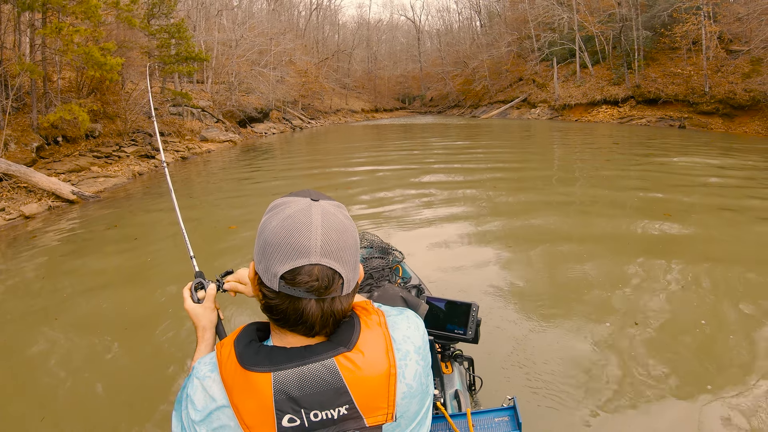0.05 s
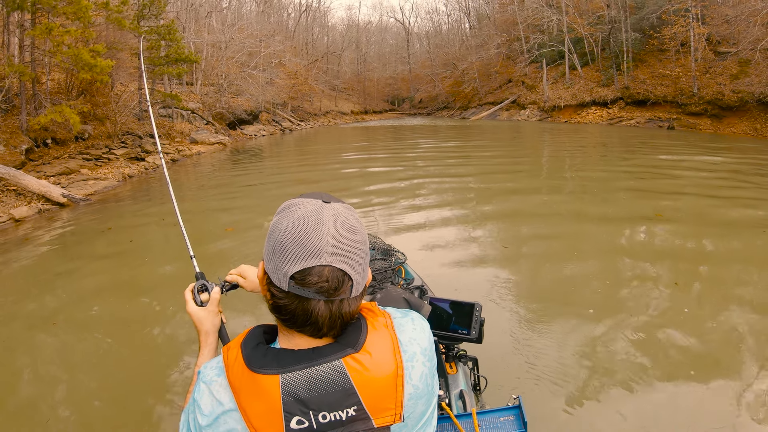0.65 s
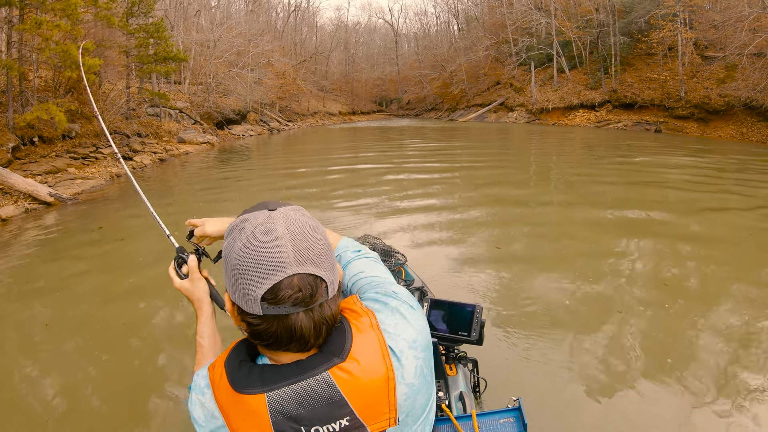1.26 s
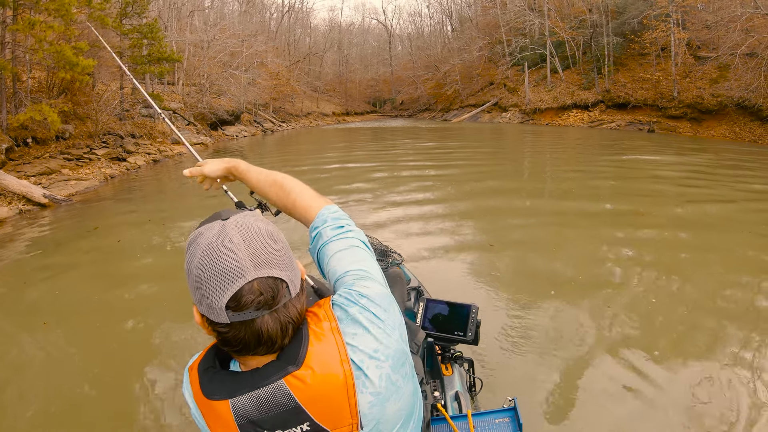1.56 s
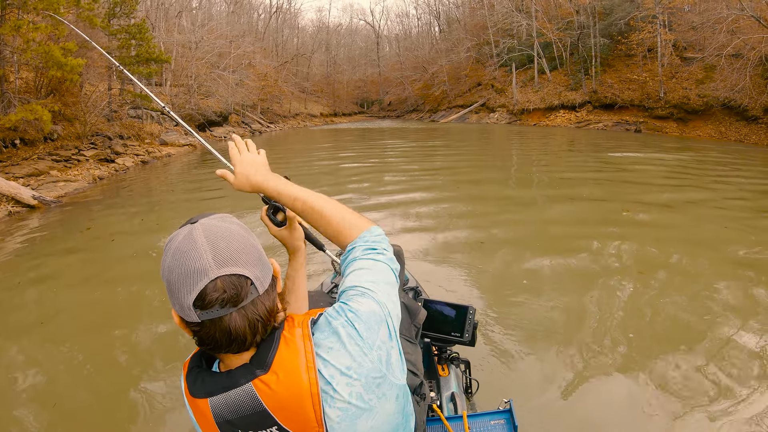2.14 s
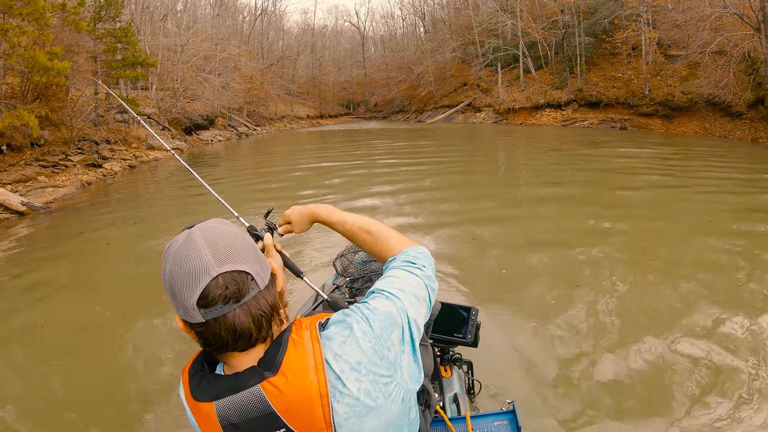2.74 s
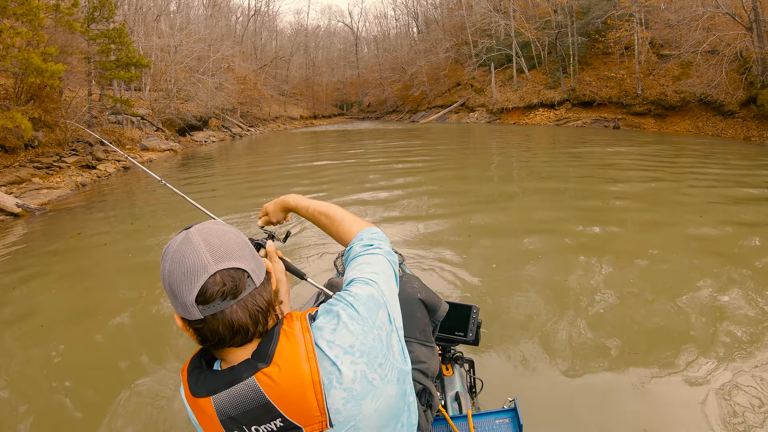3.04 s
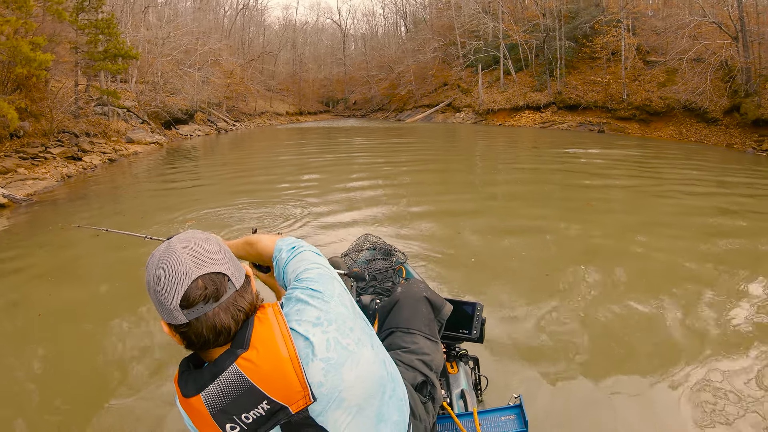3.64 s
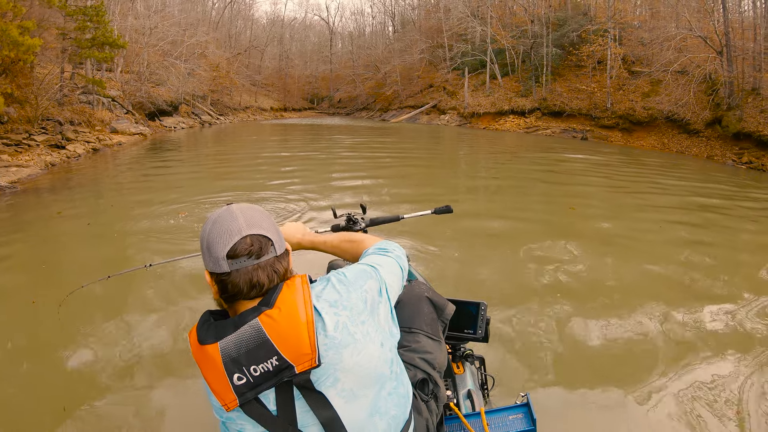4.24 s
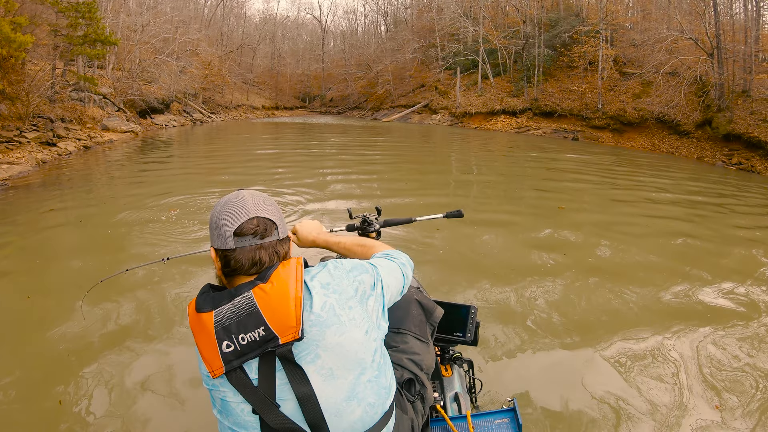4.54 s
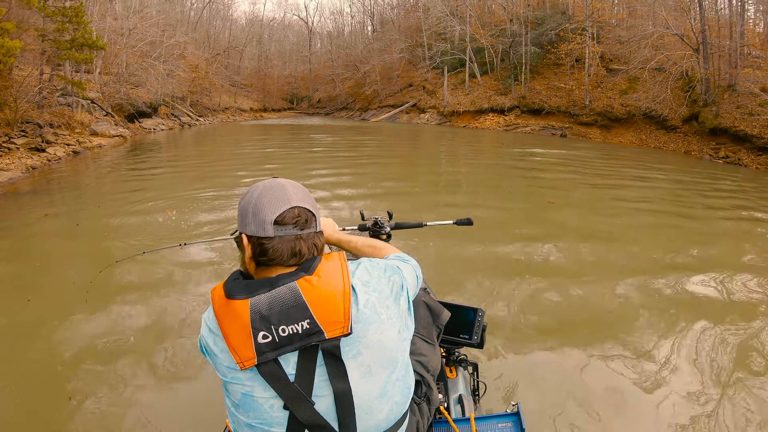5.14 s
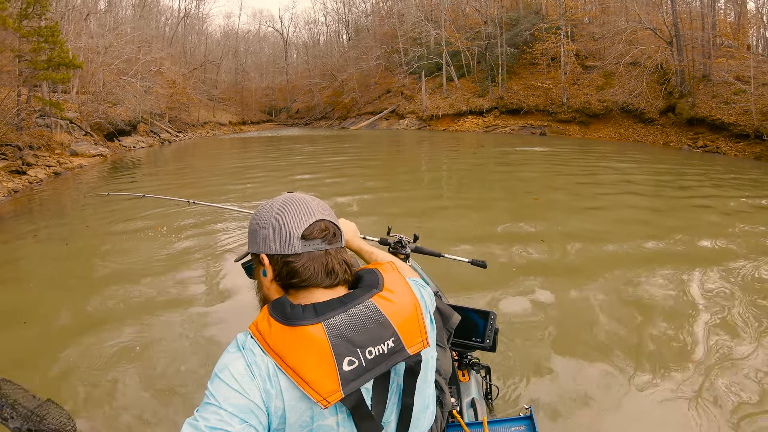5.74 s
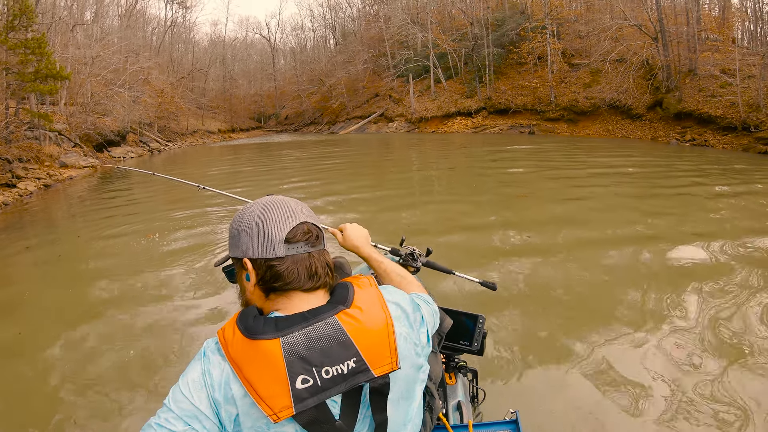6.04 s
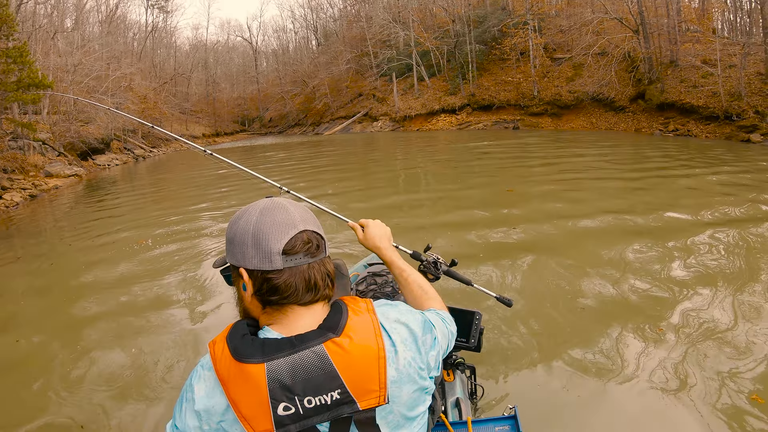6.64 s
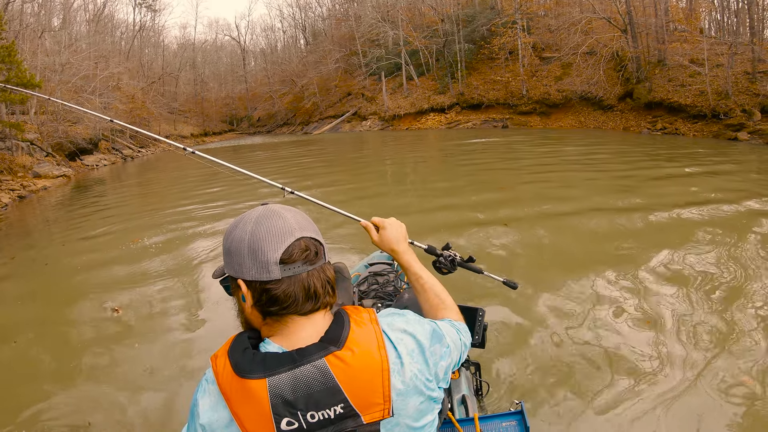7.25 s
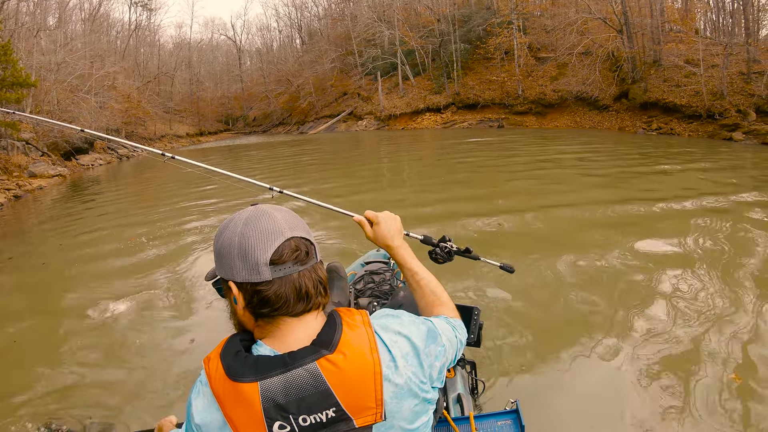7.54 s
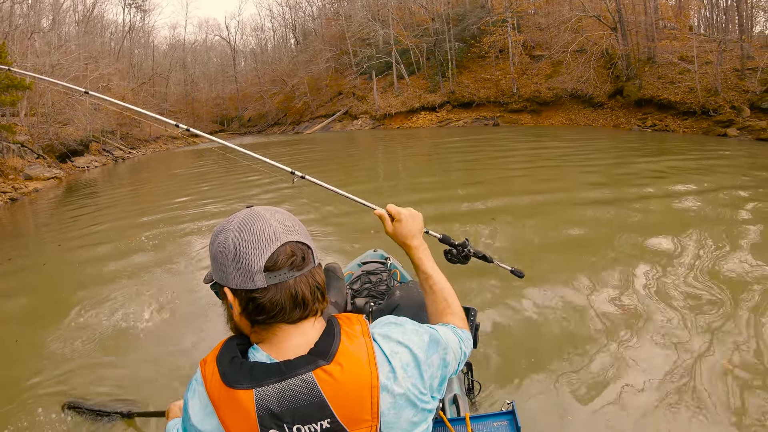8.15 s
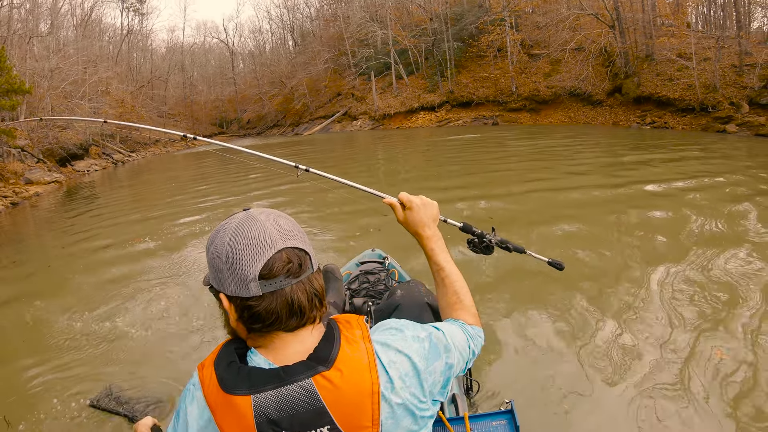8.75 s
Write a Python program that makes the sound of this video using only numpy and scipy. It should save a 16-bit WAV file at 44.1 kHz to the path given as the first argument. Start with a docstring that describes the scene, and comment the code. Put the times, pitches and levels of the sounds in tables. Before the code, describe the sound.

A hooked fish splashes close beside a kayak, with hollow knocks on the plastic hull and water lapping on a quiet lake.

```python
"""Playing a fish from a kayak

A quiet lake, heard from a camera microphone on a pole just behind the seat of a plastic kayak.
Close by, a fish thrashes twice and the landing net is dipped, in bursts of bubbles and spray.
Water gulps and laps, and the angler's shifting load knocks the hollow hull. The image is nearly mono
until the fish comes alongside. Far off on the bank, a small bird twitters faintly."""
import sys
import numpy as np
from scipy import signal
from scipy.fft import rfft, irfft, next_fast_len
from scipy.io import wavfile
from scipy.ndimage import uniform_filter1d

SR = 44100
rng = np.random.default_rng(int(sys.argv[2]) if len(sys.argv) > 2 else 0)


def log_audio(samples):
    """Write samples as a 16-bit WAV file to the path given in sys.argv[1]."""
    # one column per channel
    frames = np.atleast_2d(samples).T
    # limit to full scale, then quantise
    limited = np.clip(frames, -1, 1)
    pcm = np.round(limited * 32767).astype(np.int16)
    wavfile.write(sys.argv[1], SR, pcm)


N = 392049
TIME = np.arange(N) / SR
ALONGSIDE_S = (7.38, 7.6)  # over this span the fish comes alongside and the water sounds widen

# spectra of the open air over the lake and of the low rumble: frequency_hz, density_db
AIR_COLOUR = [(250, 3), (500, -7), (800, -4), (1300, -5.5), (2200, -9.5), (3600, -9.5), (4400, -14.5),
              (5000, -19), (5700, -33), (6600, -31.5), (8000, -30.5), (10000, -35.5), (11500, -53),
              (14000, -78)]
RUMBLE_COLOUR = [(15, -6), (30, -6), (50, -13.5), (90, -13), (200, -27.5), (400, -47)]
# rumble of breeze and boat at the microphone: time_s, level_db
RUMBLE_LEVELS = [(0, -40), (.8, -48.5), (1.8, -57), (2.4, -47), (2.8, -58.5), (3.15, -45.5), (3.7, -59),
                 (4.5, -60.5), (5.6, -61.5), (6.4, -55.5), (7.3, -53.5), (7.8, -48), (8.4, -43),
                 (8.88, -45.5)]
# water lapping under the hull: time_s, level_db
LAP_LEVELS = [(0.0, -55.5), (.6, -49), (1.51, -43.5), (1.85, -48.5), (3.21, -47), (3.86, -43), (4.1, -38),
              (4.89, -48.5), (6.11, -47.5), (6.43, -50.5), (7.27, -51), (7.64, -41.5), (8.09, -49),
              (8.43, -44), (8.88, -53.5)]
# spectrum of the lapping: frequency_hz, density_db
LAP_COLOUR = [(50, 8), (100, -11), (165, 0.5), (260, -0.5), (400, -5.5), (800, -2)]
# weight shifting against the hull: peak_s, level_db, pitch_hz, swell_s
BUMPS = [(0.021, -29, 147.5, 0.0072), (0.338, -18.5, 150.2, .022), (0.368, -20, 173.7, 0.0072),
         (0.392, -23.5, 157.8, 0.014), (2.467, -26, 168, .01), (3.1, -34.5, 122.1, 0.016),
         (3.268, -24.5, 134.7, .018), (3.322, -24, 166.8, .026), (7.578, -21.5, 118, .012),
         (7.605, -24, 125, .01), (8.336, -33.5, 135, .02)]
# jolts of the camera pole: start_s, level_db, pitch_hz, t60_s
SWAYS = [(.33, -34, 42, .2), (2.368, -31.5, 43.4, 0.1743), (8.307, -22.5, 32.58, 0.3536),
         (8.431, -34, 32.19, 0.82)]
# throws of water by tail or net: start_s, swell_s, t60_s, bubbles_db, drops_db, spray_db
SPLASHES = [(0.665, 0.02326, 1.456, -44, -43.5, -77), (.70, 0.05584, 0.99, -40.5, -53.5, -59.5),
            (.77, 0.06397, 0.686, -48.5, -47.5, -57), (.84, 0.06223, 1.102, -49.5, -44, -63.5),
            (.98, 0.02637, 0.2772, -55, -49.5, -64), (1.072, 0.01774, 0.1456, -44.5, -35, -51.5),
            (1.111, 0.01653, 0.3877, -66.5, -47, -69.5), (1.19, 0.03327, 0.788, -42.5, -46.5, -62.5),
            (1.229, 0.0645, 0.3326, -39.5, -41, -68.5), (1.35, 0.08434, 0.4146, -45, -49, -67.5),
            (1.491, 0.0866, 0.828, -38.5, -45, -73.5), (1.57, 0.05853, 0.3855, -65.5, -63, -65),
            (1.66, 0.07766, 1.152, -49, -64.5, -77), (1.8, 0.1833, 1.33, -55.5, -60, -78.5),
            (5.787, 0.02394, 0.45, -53.5, -51, -64.5), (5.83, 0.05159, 0.3675, -37, -35.5, -60),
            (5.894, 0.04176, 0.4191, -30.5, -37.5, -73.5), (5.925, 0.04897, 0.2812, -41, -35, -55.5),
            (7.27, 0.04959, 0.7391, -50, -62.5, -68), (7.419, 0.00544, 0.3747, -45, -60, -71.5),
            (7.51, 0.03709, 0.3296, -51, -49.5, -53.5), (7.54, 0.05753, 0.2117, -42, -64, -71),
            (7.609, 0.05708, 0.6772, -47, -50.5, -50.5), (7.72, 0.036716, 0.31994, -43.5, -50.5, -54.5),
            (7.79, 0.07901, 0.3344, -51.5, -56, -58.5), (7.9, 0.040446, 0.2334, -69.5, -61.5, -53.5),
            (7.969, 0.02155, 0.1679, -46, -42.5, -47.5), (8.119, 0.03712, 0.2604, -47.5, -53.5, -63),
            (8.196, 0.00465, 0.97, -53.5, -51.5, -54.5), (8.305, 0.04724, 0.1533, -40, -42.5, -49),
            (8.38, 0.0445, 0.96, -52.5, -53.5, -58), (8.82, 0.0135, 0.2692, -57.5, -58.5, -68.5)]
# bubbles, drops and fine spray: low_hz, high_hz, ring_cycles, scatter_db, foam_share, clump_db, count
GRAINS = [(480, 2200, 26, 3.7, .5, 1.1, 8000), (2200, 5500, 22, 4.4, .8, 1.6, 7000),
          (6100, 14500, 14, 5.3, .68, 2.5, 9000)]
# spectrum of each bout of splashing: frequency_hz, density_db
FIRST_BOUT = [(240, -34.5), (400, -11), (470, -24), (598, -7), (1010, -6.5), (1120, -3.5), (1820, -3.5),
              (2250, -8.5), (3730, -0.5), (5910, -22), (7610, -24), (9510, -18.5), (14000, -49)]
NET_DIP = [(240, -61.5), (400, -18.5), (515, -15), (683, -15), (781, -7.5), (948, -15.5), (1640, -1),
           (1770, -6), (3360, -12), (4390, -17), (5820, -34), (8960, -30.5), (14000, -58)]
LAST_BOUT = [(240, -38.5), (400, 1), (539, -15.5), (725, -6.5), (934, -6.5), (1910, -3), (2210, -9),
             (2650, -17), (3260, -9), (5020, -7), (7380, -21), (9510, -14.5), (14000, -42.5)]
# fish, net, then fish again, closer: start_s, end_s, spectrum, stereo_width, foam_gain
BOUTS = [(0, 5, FIRST_BOUT, 0, 2.315), (5, 7, NET_DIP, 0.04, 2.0946), (7, 9, LAST_BOUT, 0.7, 1.6825)]
# slaps of water, drops and clacks of tackle: start_s, level_db, centre_hz
SLAPS = [(0.668, -32.5, 2805), (0.678, -31, 2380), (0.762, -48, 3193), (0.811, -28, 2846),
         (0.889, -38.5, 1876), (0.967, -29.5, 3221), (1.003, -38, 9050), (1.029, -28, 689.3),
         (1.041, -41.5, 9375), (1.07, -41, 3900), (1.086, -32, 3683), (1.087, -19, 3945),
         (1.153, -44.5, 3077), (1.194, -36.5, 7974), (1.301, -21.5, 3520), (1.452, -35, 2982),
         (1.553, -35.5, 1397), (1.581, -22, 1496), (2.636, -60.5, 8500), (4.775, -56.5, 8478),
         (3.697, -46, 2809), (3.701, -32, 664.8), (3.825, -40, 1000), (3.849, -44.5, 1000),
         (3.868, -37, 800), (3.914, -34.5, 1100), (3.935, -33, 1010), (3.958, -21.5, 3050),
         (4.004, -32, 1100), (4.025, -36, 1108), (4.042, -41.5, 912.8), (4.072, -38.5, 900),
         (5.133, -37, 700), (4.094, -33, 893), (5.344, -31, 2000), (5.352, -36, 1900), (5.379, -36, 1700),
         (5.514, -48.5, 5632), (5.534, -36, 3771), (5.858, -19.5, 2400), (5.867, -18.5, 1238),
         (5.881, -21.5, 2203), (6.18, -30.5, 684.8), (6.186, -36.5, 2800), (6.374, -52.5, 8296),
         (6.437, -53, 5400), (6.696, -39.5, 745.4), (7.296, -34.5, 2218), (7.317, -37.5, 3626),
         (7.433, -38.5, 3592), (7.522, -32.5, 4464), (7.571, -22.5, 791.4), (7.611, -43.5, 7020),
         (7.631, -32, 7048), (7.652, -32.5, 6514), (7.678, -40.5, 4057), (7.705, -29, 8592),
         (7.753, -27, 9070), (7.752, -32.5, 2131), (7.866, -33, 7998), (7.953, -31.5, 8590),
         (7.993, -26, 3916), (8.008, -44, 5040), (8.203, -36.5, 4389), (8.27, -35, 4754),
         (8.424, -46, 5000), (8.489, -44, 3830), (8.604, -45, 3011), (8.724, -38.5, 7530)]
# single large bubbles: start_s, level_db, first_hz
GULPS = [(.69, -43.5, 606.1), (.722, -35.5, 643.7), (0.785, -28.5, 171), (.886, -19, 998.2),
         (1.029, -28, 544.2), (1.206, -20, 1696), (1.292, -29, 524.6), (1.467, -31.5, 367.3),
         (1.506, -30, 831.5), (1.553, -19, 947.9), (1.575, -22, 800.6), (1.609, -30.5, 244.1),
         (1.698, -34, 1510), (1.765, -25, 987.2), (5.844, -19, 1826), (5.92, -23, 1402),
         (6.006, -21.5, 3139), (6.07, -23, 1875), (6.151, -30.5, 1028), (7.428, -28, 1625),
         (7.503, -32, 629.8), (7.636, -36, 586), (7.652, -39, 505.7), (7.721, -31, 1022),
         (8.147, -30.5, 738.3), (8.462, -26, 684.8), (8.477, -39, 1790), (8.528, -36, 620.6)]
# troughs of water sloshing shut: start_s, length_s, level_db, first_hz, last_hz
SLOSHES = [(0.752, .15, -44.5, 680, 1081), (1.234, 0.09003, -39, 1052, 624.7),
           (1.372, 0.11444, -45, 1350, 1126), (1.508, 0.07165, -34, 485.7, 718.5),
           (1.57, .1, -40, 1152, 806.8), (1.683, 0.11544, -41.5, 678.3, 976.5),
           (1.767, .05, -46, 471.4, 408), (5.899, 0.06097, -34.5, 1751, 1465),
           (7.559, 0.047, -43, 901.5, 596.4), (8.45, .06, -45.5, 680.8, 807.1)]
# knocks on the hull: start_s, level_db, panel_hz, scuff_db, rebound_after_s (0 for none)
KNOCKS = [(0.824, -24.5, 189.5, -52, 0), (0.855, -19.5, 332.4, -43, 0), (1.649, -26, 154.5, -59.5, 0),
          (2.166, -33, 267.8, -47.5, 0.006896), (2.354, -27.5, 347.1, -56.5, 0),
          (2.39, -24.5, 258.3, -75.5, 0.02478), (2.693, -21, 357.5, -58.5, 0.001364),
          (2.745, -31.5, 253.7, -64.5, 0.004385), (3.7, -22.5, 274.4, -42.5, 0.012),
          (3.884, -18, 456.4, -42, 0), (3.914, -24.5, 416.5, -53.5, 0.000716),
          (3.936, -22.5, 439.2, -45.5, 0.008837), (3.974, -1, 229.7, -29.5, 0),
          (3.992, -18.5, 173.9, -40.5, 0.000054), (4.016, -26, 179.4, -47.5, 0.000155),
          (4.092, -35.5, 407.8, -46.5, 0.000774), (4.11, -22, 348, -45.5, 0.02012),
          (4.234, -21, 413.5, -42.5, 0), (4.304, -19, 368, -39.5, 0.026634),
          (4.43, -30.5, 204, -48, 0.02605), (4.704, -18.5, 253.4, -43.5, 0.008),
          (4.735, -23.5, 250.1, -59.5, 0), (4.975, -30, 337.9, -52, 0.000987),
          (5.046, -26.5, 218, -55.5, 0.00121), (5.13, -28, 300, -46, 0),
          (5.363, -23, 224.5, -34.5, 0.02445), (5.583, -34, 302, -43.5, 0.01806),
          (6.178, -14.5, 428.5, -43.5, 0.00823), (6.347, -24, 495.5, -42, 0.011853),
          (6.696, -21, 339.2, -47.5, 0), (7.271, -21, 411.1, -50, 0.003757), (7.304, -23, 532.8, -47, 0),
          (7.554, -16, 328.8, -56.5, 0.000288), (7.572, -17, 146.2, -44, 0.00322),
          (7.593, -23.5, 175.4, -58.5, 0.00126), (7.807, -15, 274.6, -46, 0)]
# modes of the hollow hull: pitch_hz, level_db, t60_s
HULL_MODES = [(168.16, -13.5, 0.1847), (218.12, -20, 0.2254), (253.76, -40, 0.36), (299.65, -12, 0.14388),
              (400.62, -13, 0.14853), (443.03, -29, 0.16), (545.29, -15.5, 0.10413), (661.75, -18, 0.1221),
              (1034.3, -28.5, 0.11)]
# the bird's falling trills: start_s, length_s, full_voice_db
TRILLS = [(1.129, .82, -68), (4.099, .82, -68), (6.836, 1.08, -65)]
# its lone calls: middle_s, top_hz, level_db
LONE_CALLS = [(3.49, 7732, -72.5), (5.26, 7518, -71), (6.479, 7536, -70)]
# a loose fitting shaken by some of the knocks: start_s, level_db
CLINKS = [(2.356, -49), (2.394, -33), (2.414, -56.5), (2.694, -47), (2.746, -44.5), (4.707, -43.5),
          (5.045, -41.5)]
# modes of that fitting: pitch_hz, level_db, t60_s
FITTING_MODES = [(1289.1, -17, .035), (1586.2, 1.5, 0.02886), (1675.8, -13, .022), (3337.3, -13, .02)]
# sleeves brushing the life vest: middle_s, level_db, length_s, centre_hz
RUSTLES = [(3.11, -60, 0.2041, 971.3), (3.306, -57.5, 0.3194, 996.3), (3.623, -56.5, 0.7146, 792.3),
           (3.934, -49, 0.38595, 702.8), (4.134, -45.5, 0.08702, 702.8), (4.647, -52.5, 0.22, 729.3),
           (5.372, -39.5, 0.07797, 685.8), (5.57, -55, 0.13519, 2306)]
# cavities closing behind the fish: start_s, level_db, first_hz, last_hz, length_s
GLUGS = [(7.432, -26, 375.7, 620.6, 0.04581), (7.592, -18, 189.7, 802.1, 0.02),
         (7.673, -33, 434.2, 855.4, 0.015581), (7.832, -34.5, 317.8, 403.4, 0.04951)]


def undb(db):
    """Decibels to gain."""
    return 10 ** (np.asarray(db) / 20)


def unit(x):
    """Scale to rms 1."""
    return x / np.sqrt(np.mean(x ** 2) + 1e-18)


def add(out, start_s, x):
    """Mix x into out from start_s on."""
    i = max(int(start_s * SR), 0)
    out[..., i:i + x.shape[-1]] += x[..., :max(N - i, 0)]


def butter(x, hz, kind, order):
    """Butterworth low-pass or high-pass."""
    return signal.sosfilt(signal.butter(order, min(hz, .45 * SR), kind, fs=SR, output="sos"), x)


def colour(x, points):
    """Filter x by a curve of (Hz, dB) points, falling 24 dB an octave past both ends; rms 1."""
    hz, db = np.transpose(points)
    size = next_fast_len(N, real=True)
    octave = np.log2(np.maximum(np.fft.rfftfreq(size, 1 / SR), 1))
    beyond = np.abs(octave - np.clip(octave, np.log2(hz[0]), np.log2(hz[-1])))
    shape_db = np.interp(octave, np.log2(hz), db) - 24 * beyond
    return unit(irfft(rfft(x, size) * undb(shape_db), size)[:N])


def wander(rate_hz):
    """Smooth random drift with a spread near 1."""
    knots = rng.standard_normal(2000)
    return np.interp(TIME * rate_hz, np.arange(len(knots)), knots)


def fade(t, t60):
    """Exponential decay, 60 dB down at t60."""
    return np.exp(-np.log(1000) * t / t60)


def ring(hz, t60, attack_s, octaves_per_s=0):
    """A damped tone that builds up over attack_s and may glide upward."""
    t = np.arange(int(1.2 * t60 * SR) + 2) / SR
    phase = 2 * np.pi * np.cumsum(hz * 2 ** np.minimum(octaves_per_s * t, 2)) / SR
    return np.sin(phase) * fade(t, t60) * (1 - np.exp(-t / max(attack_s, 1e-5)))


def band_noise(hz, spread, length_s=.5):
    """Up to half a second of noise between hz / spread and hz * spread."""
    edges = np.clip([hz / spread, hz * spread], 50, .45 * SR)
    band = signal.butter(2, edges, "band", fs=SR, output="sos")
    return unit(signal.sosfilt(band, rng.standard_normal(SR // 2)))[:int(length_s * SR)]


def crack(hz, t60, spread):
    """A decaying burst of noise around hz."""
    burst = band_noise(hz, spread)
    return burst * fade(TIME[:len(burst)], t60)


def reverb(x, t60, wet_db):
    """Add a diffuse tail of reflections."""
    tail = rng.standard_normal(SR) * fade(TIME[:SR], t60)
    return x + undb(wet_db) * signal.fftconvolve(x, tail / np.sqrt(np.sum(tail ** 2)))[:N]


def mid_side(mid, side):
    """Left and right from mid and side."""
    return mid + side * np.array([[1], [-1]])


def widen(x, width):
    """Spread a steady texture in stereo, with an unrelated stretch of itself as the side."""
    return mid_side(x, width * np.roll(x, N // 2))


def air():
    """An even hiss over the lake; a rumble of breeze and boat at the microphone."""
    noise = rng.standard_normal((4, N))
    hiss = mid_side(colour(noise[0], AIR_COLOUR), 0.0046 * colour(noise[1], AIR_COLOUR))
    hiss *= undb(-56.9 + 0.69 * wander(1.9))
    # late on, a puff of breeze buffets each microphone port on its own
    buffet = np.interp(TIME, [7.3, 7.6], [.03, .55])
    rumble = mid_side(colour(noise[2], RUMBLE_COLOUR), buffet * colour(noise[3], RUMBLE_COLOUR))
    rumble_db = np.interp(TIME, *np.transpose(RUMBLE_LEVELS)) + 2 * wander(2.4)
    return hiss + rumble * undb(rumble_db)


def bubble_shower(low_hz, high_hz, cycles, scatter_db, count):
    """A steady shower of bubbles, each ringing and rising in pitch as it nears the surface; rms 1."""
    out = np.zeros(N)
    for when, pitch, luck, life in rng.random((count, 4)):
        hz = low_hz * (high_hz / low_hz) ** pitch
        t60 = cycles * (.5 + life) / hz
        strength = undb(scatter_db * min(-np.log(1 - luck), 3.5))
        add(out, when * TIME[-1], strength * ring(hz, t60, .2 / hz, .25 / t60))
    # crowding evens out over a few hundredths of a second
    local_power = uniform_filter1d(out ** 2, SR // 14)
    return unit(out / np.sqrt(local_power + 0.24 * np.mean(out ** 2)))


def lapping(trim_db=-2.5):
    """Wavelets burble against the hull, below the microphone."""
    bubbles = bubble_shower(91.124, 640.96, cycles=23.2, scatter_db=1.7, count=1500)
    burble = colour(bubbles + .5 * rng.standard_normal(N), LAP_COLOUR)
    width = np.interp(TIME, ALONGSIDE_S, [0, 0.2121])
    return widen(burble, width) * undb(np.interp(TIME, *np.transpose(LAP_LEVELS)) + trim_db)


def hull_bumps(t60=0.1143, flex_db=-14):
    """A slow push swells into a low boom; the flexing hull wall adds a rough overtone."""
    out, t = np.zeros(N), TIME[:SR // 3]
    for s, db, hz, swell_s in BUMPS:
        shape = np.minimum(t / swell_s, 1) ** 2 * fade(np.maximum(t - swell_s, 0), t60)
        boom = np.sin(2 * np.pi * hz * t)
        flex = band_noise(1.5352 * hz, spread=1.3215)[:len(t)]
        add(out, s - swell_s, undb(db) * shape * (boom + undb(flex_db) * flex))
    return butter(out, 630, "low", order=4)


def pole_sway():
    """The pole under the microphone wobbles after a jolt."""
    out = np.zeros(N)
    for s, db, hz, t60 in SWAYS:
        add(out, s, undb(db) * ring(hz, t60, attack_s=0.0017))
    return out


def splash_gains(start_s, end_s, drizzle_db=-17.5, drizzle_t60=1.9121):
    """Gain of each grain size through a bout: splashes swell, die away and fall back as drizzle."""
    power, t = np.zeros((len(GRAINS), N)), TIME[:2 * SR]
    for s, swell_s, t60, *levels_db in SPLASHES:
        if start_s <= s < end_s:
            swell = np.minimum(t / swell_s, 1) ** 0.658
            after = np.maximum(t - swell_s, 0)
            decay = np.maximum(fade(after, t60), undb(drizzle_db) * fade(after, drizzle_t60))
            add(power, s, np.outer(undb(levels_db), swell * decay) ** 2)
    return np.sqrt(power)


def splashes(spurt_db=1.2, spurt_hz=170, clump_hz=40):
    """Water torn by tail or net, close by: bubbles, drops and fine spray over a wash of foam."""
    out = np.zeros((2, N))
    # sheets of water break up in quick spurts that all grain sizes share
    spurts = unit(undb(spurt_db * wander(spurt_hz)))
    bout_gains = [splash_gains(start_s, end_s) for start_s, end_s, *_ in BOUTS]
    for size, (low_hz, high_hz, cycles, scatter_db, foam_share, clump_db, count) in enumerate(GRAINS):
        shower = bubble_shower(0.88746 * low_hz, 1.1188 * high_hz, cycles, scatter_db, count)
        layers = np.array([shower, foam_share * rng.standard_normal(N)])
        bubbles, foam = butter(butter(layers, low_hz, "high", order=9), high_hz, "low", order=8)
        # each size also comes in slower clumps of its own
        clumps = spurts * unit(undb(clump_db * wander(clump_hz)))
        fineness = min(low_hz / 7150, 1) ** 0.3124  # finer spray spreads wider
        for gains, (_, _, spectrum, width, foam_gain) in zip(bout_gains, BOUTS):
            texture = colour(bubbles + foam_gain * foam, spectrum)
            out += gains[size] * clumps * widen(texture, width * fineness)
    return out


def slaps(t60_at_1khz=0.02443):
    """Water and tackle crack, the high ones shortest and widest; alongside, all are crisper."""
    out = np.zeros((2, N))
    for s, db, hz in SLAPS:
        near = np.interp(s, ALONGSIDE_S, [0, 1])
        t60 = t60_at_1khz / (hz / 1000) ** 0.3725 * (1 - 0.1297 * near)
        width = 0.3253 * min((hz / 9000) ** 2, 1)
        mid = crack(hz, t60, spread=1.5863 + 0.2488 * near)
        side = width * crack(hz, t60, spread=1.2647)
        edge_hz = (1.1917 + 0.3578 * near) * hz
        add(out, s, undb(db) * butter(mid_side(mid, side), edge_hz, "low", order=6))
    return butter(out, 11300, "low", order=4)


def gulps(cycles=23.117, rise_octaves=0.4312):
    """Air pockets ring and rise in pitch, the large ones longest, echoed by the side of the boat."""
    out = np.zeros(N)
    for s, db, hz in GULPS:
        t60 = cycles / hz
        add(out, s, undb(db) * ring(hz, t60, attack_s=0.0005965, octaves_per_s=rise_octaves / t60))
    width = np.interp(TIME, ALONGSIDE_S, [0, 0.35])
    mid = reverb(out, t60=0.1848, wet_db=-2.594)
    reflections = reverb(out, t60=0.14, wet_db=0) - out
    return mid_side(mid, width * reflections)


def sloshes(pitch_scatter=0.17937):
    """Crowds of bubbles warble around a pitch that glides as the trough changes shape."""
    out = np.zeros(N)
    for s, length_s, db, first_hz, last_hz in SLOSHES:
        u = np.linspace(0, 1, int(length_s * SR))
        noise = rng.standard_normal((2, SR // 2))
        crowd = butter(noise, pitch_scatter * first_hz, "low", order=2)[:, -len(u):]
        phase = 2 * np.pi * np.cumsum(first_hz * (last_hz / first_hz) ** u) / SR
        warble = unit(crowd[0] * np.cos(phase) + crowd[1] * np.sin(phase))
        swell = 4 * u * (1 - u)
        add(out, s, undb(db) * swell * warble)
    return out


def blows(rebound_db=-3.5, rebound_pitch=0.95446):
    """The load strikes the hull and sometimes falls back, softer and lower."""
    for s, db, hz, scuff_db, rebound_s in KNOCKS:
        yield s, db, hz, scuff_db
        if rebound_s > 0:
            yield s + rebound_s, db + rebound_db, hz * rebound_pitch, scuff_db + 2 * rebound_db


def hull_knocks(contact_s=0.00039, light_cycles=19.379, light_db=-23.5, halving_db=14):
    """Each knock booms at its panel's pitch, scuffs at the contact and sets the whole shell ringing."""
    body, scuffs = np.zeros(N), np.zeros(N)
    press = 1 - np.exp(-TIME[:SR // 2] / contact_s)
    for s, db, hz, scuff_db in blows():
        # a hard blow stays pressed on the panel and damps it; a low one builds up more slowly
        cycles = light_cycles / 2 ** (max(db - light_db, 0) / halving_db)
        add(body, s, undb(db) * ring(hz, cycles / hz, attack_s=0.2083 / hz))
        for mode_hz, mode_db, t60 in HULL_MODES:
            luck, detune = rng.standard_normal(2)
            reach_db = -4.5 * abs(np.log2(mode_hz / hz))  # modes far from the blow's pitch get less
            mode = ring(mode_hz * (1 + 0.035035 * detune), t60, attack_s=0.007636)
            add(body, s, undb(db + mode_db + reach_db + 2 * luck) * mode)
        add(body, s, undb(db - 22.5) * press * crack(1.4823 * hz, t60=0.09287, spread=1.3806))
        add(scuffs, s, undb(scuff_db) * press * crack(910, t60=0.05811, spread=2.9622))
    # the knocks carry no deep bass, and their treble rolls off gently
    body = butter(butter(body, 115.22, "high", order=9), 2000, "low", order=2)
    return body + butter(scuffs, 5110, "low", order=8)


def bird_notes(step_s=.0868, first_hz=8262, settled_hz=7095.3, fall_s=0.2, swell_s=0.556):
    """Lone calls, and evenly spaced trill notes that sink in pitch and grow louder."""
    yield from LONE_CALLS
    for s, length_s, db in TRILLS:
        for t in np.arange(0, length_s, step_s):
            hz = settled_hz + (first_hz - settled_hz) * np.exp(-t / fall_s)
            yield s + t, hz, db - 11 * max(1 - t / swell_s, 0)


def bird(note_s=0.052, arch_hz=800, scatter_hz=50, scatter_db=1.2):
    """Thin arched notes from the distant bank, blurred by the woods."""
    out, u = np.zeros(N), np.linspace(-1, 1, int(note_s * SR))
    shape = np.cos(np.pi * u / 2) ** 2
    for s, hz, db in bird_notes():
        detune, luck = rng.standard_normal(2)
        quiver = 250 * uniform_filter1d(rng.standard_normal(len(u)), 10)
        phase = 2 * np.pi * np.cumsum(hz + scatter_hz * detune - arch_hz * u ** 2 + quiver) / SR
        add(out, s - note_s / 2, undb(db + scatter_db * luck) * shape * np.sin(phase))
    return reverb(out, t60=.45, wet_db=-4.5)


def clinks():
    """A small hard fitting rings for a moment when the boat is jolted."""
    out = np.zeros(N)
    for s, db in CLINKS:
        for hz, mode_db, t60 in FITTING_MODES:
            add(out, s, undb(db + mode_db) * ring(hz, t60, attack_s=0.000976))
    return out


def rustles(slip_db=4.544, slip_hz=120):
    """The angler's clothing drags in small uneven slips, just ahead of the microphone."""
    out = np.zeros(N)
    for s, db, length_s, hz in RUSTLES:
        rub = band_noise(hz, spread=1.6222, length_s=length_s)
        add(out, s - length_s / 2, undb(db) * rub * np.hanning(len(rub)))
    return butter(out * undb(slip_db * wander(slip_hz)), 3600, "low", order=6)


def glugs(attack_s=.004, wobble_db=3, wobble_hz=130):
    """An air cavity beside the boat rings and wobbles, its pitch climbing ever faster as it shrinks."""
    out = np.zeros(N)
    for s, db, first_hz, last_hz, length_s in GLUGS:
        t = TIME[:int(length_s * SR)]
        hz = first_hz * (last_hz / first_hz) ** ((t / length_s) ** 1.7693)
        shape = np.minimum(t / attack_s, 1) * (1 - t / length_s) ** 0.3854
        add(out, s, undb(db) * shape * np.sin(2 * np.pi * np.cumsum(hz) / SR))
    wobble = unit(undb(wobble_db * wander(wobble_hz)))
    return reverb(out * wobble, t60=0.1921, wet_db=-5.0)


def scene():
    """From behind the seat: the boat underneath, the water close around, the bank far off."""
    boat = hull_knocks() + hull_bumps() + clinks() + pole_sway() + rustles()
    water = splashes() + sloshes() + lapping() + gulps() + glugs() + slaps()
    return air() + boat + water + bird()


def record(dry):
    """The camera cuts the treble steeply above 15.6 kHz."""
    return signal.sosfilt(signal.ellip(8, .2, 70, 15600, fs=SR, output="sos"), dry)


dry = scene()
out = record(dry)
log_audio(out)
```